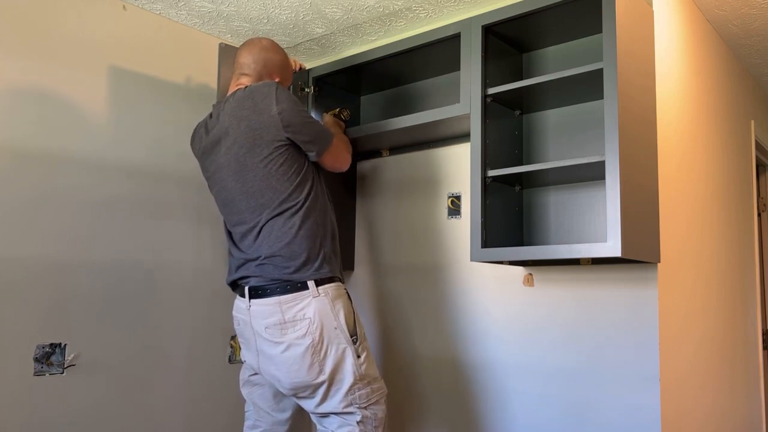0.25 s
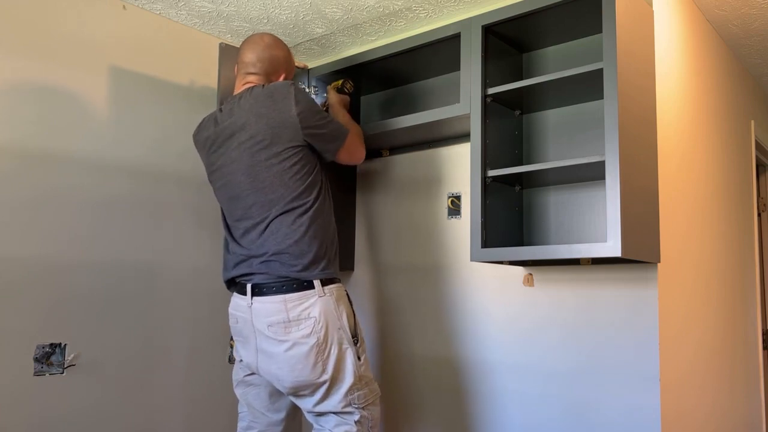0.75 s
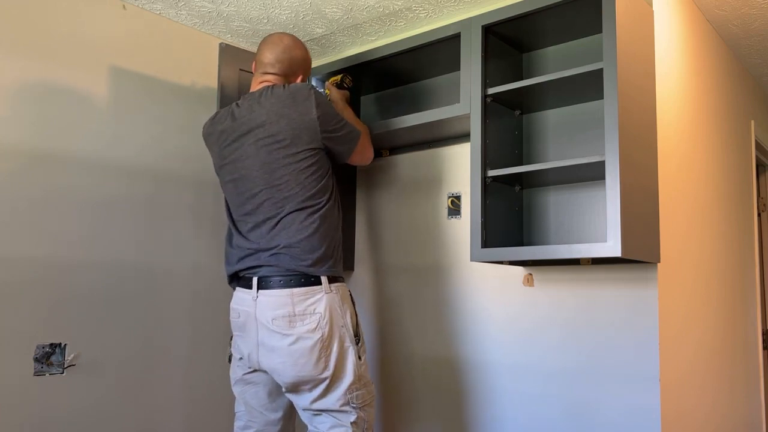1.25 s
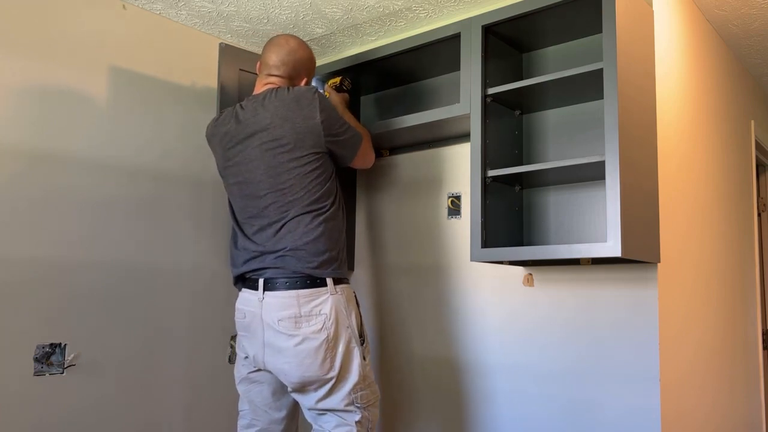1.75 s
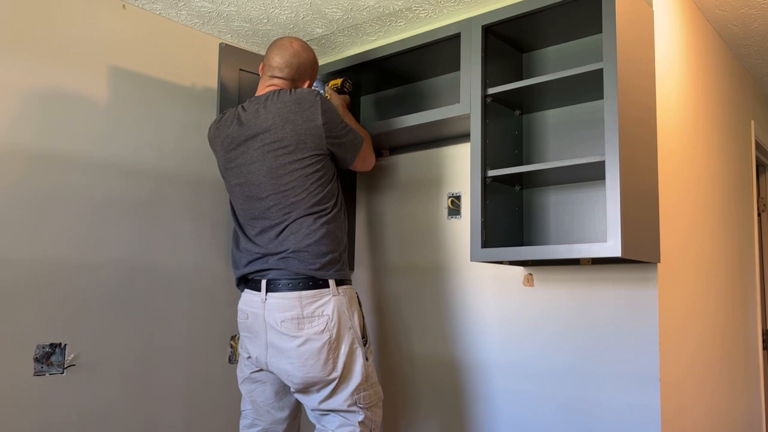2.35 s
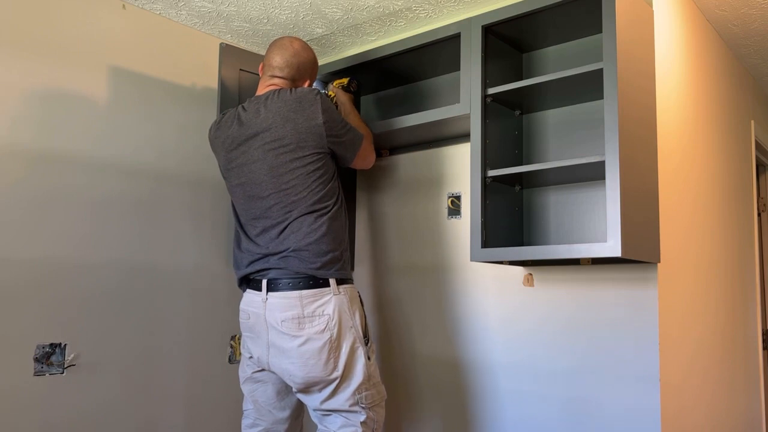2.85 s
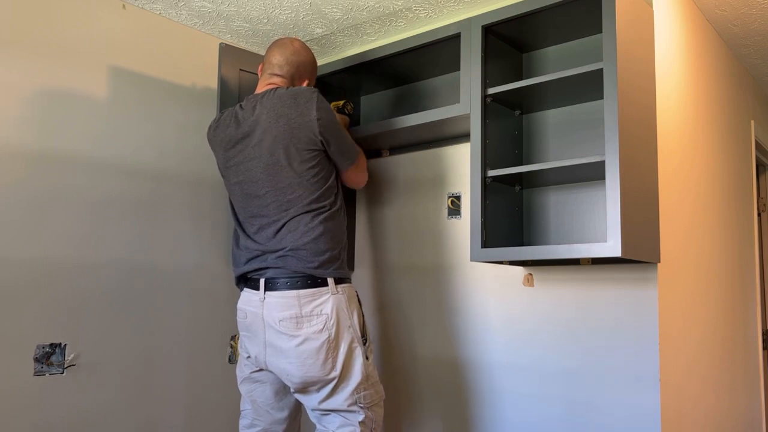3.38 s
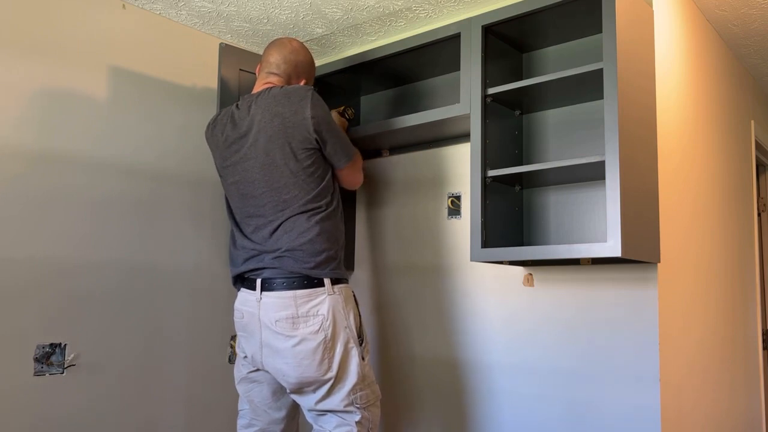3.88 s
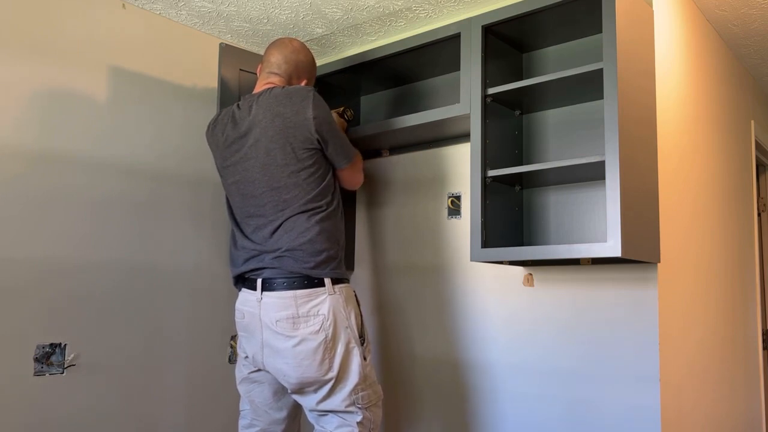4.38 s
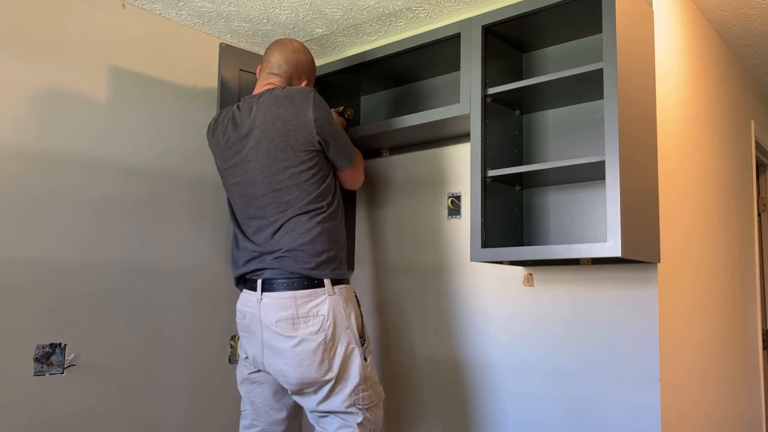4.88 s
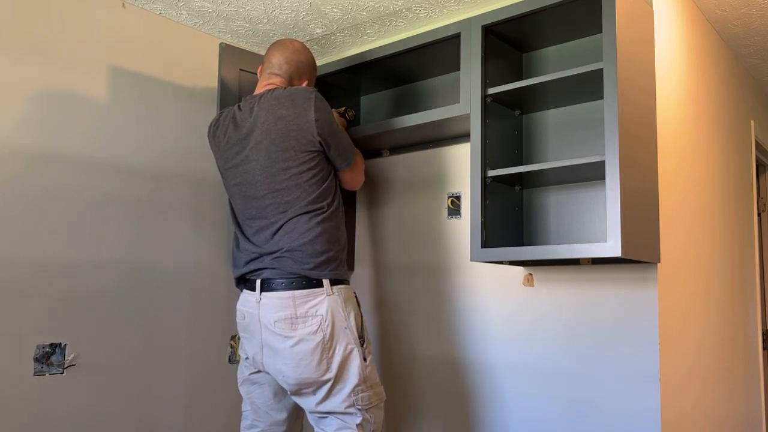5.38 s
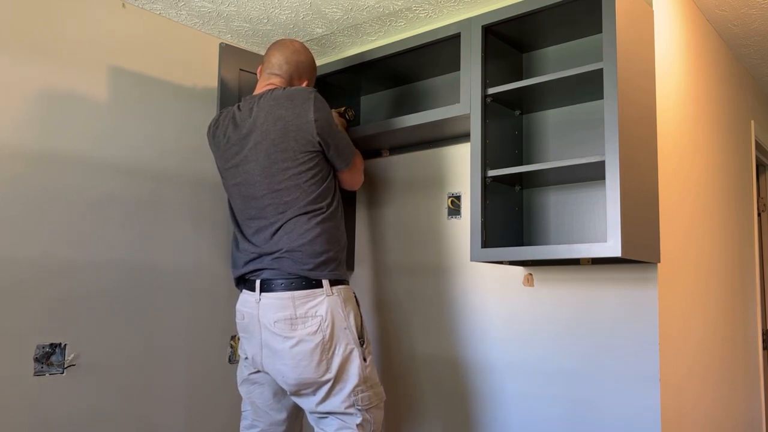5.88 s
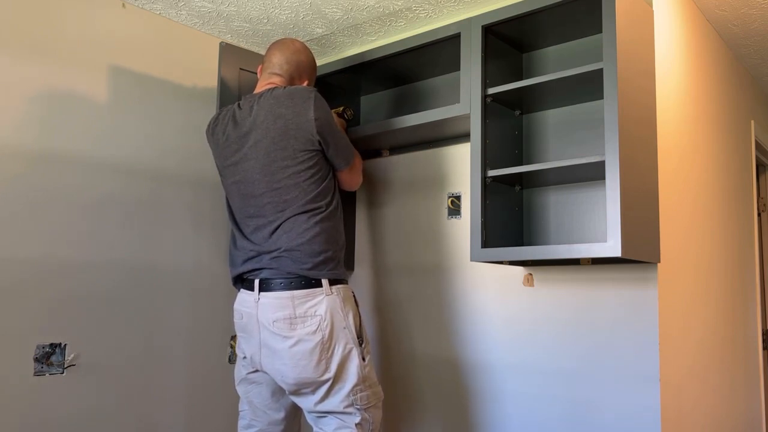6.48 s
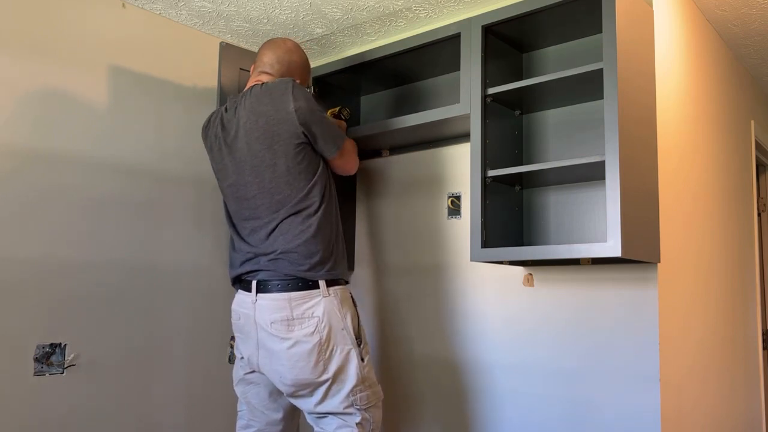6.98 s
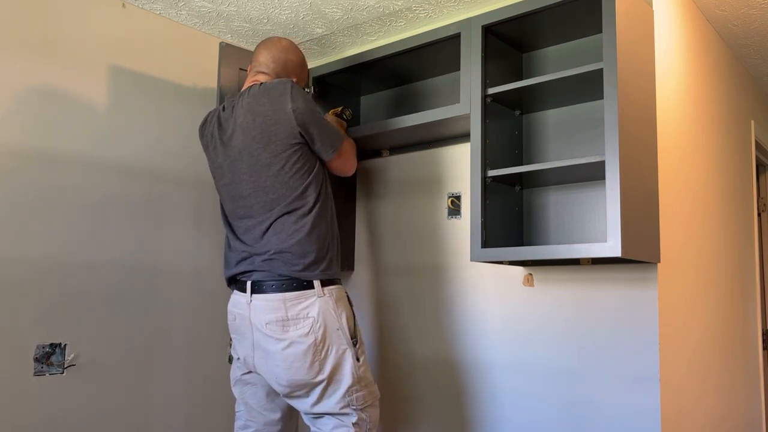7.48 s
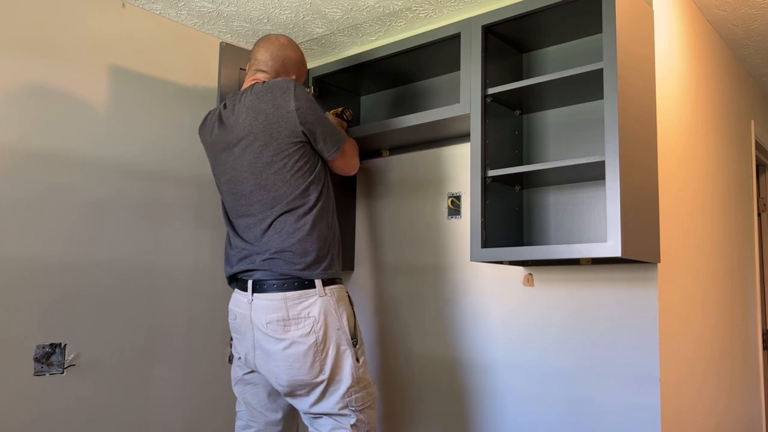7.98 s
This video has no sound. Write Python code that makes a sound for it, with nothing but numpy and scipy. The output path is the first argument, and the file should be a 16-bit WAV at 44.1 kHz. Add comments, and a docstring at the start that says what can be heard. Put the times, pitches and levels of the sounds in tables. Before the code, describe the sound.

Sharp, irregular knocks, clicks and hollow thumps with short scrapes as someone works on a wooden cabinet in a bare, echoing kitchen.

```python
"""A bare, echoing kitchen, where someone works on a wall cabinet. Hard contacts on wood and hinge
make sharp knocks and clicks, often followed by the low thump of a hollow panel. Short scrapes are
made of many tiny slips, and a steel tip ticks on the hinge. A faint, lumpy rumble lies underneath.
Two closely spaced microphones hear the sounds directly and through the room's echoes."""
import sys
import numpy as np
from scipy import signal
from scipy.fft import rfft, irfft, next_fast_len
from scipy.io import wavfile
from scipy.ndimage import uniform_filter1d

SR = 44100
rng = np.random.default_rng(int(sys.argv[2]) if len(sys.argv) > 2 else 0)


def materialize(psi):
    """Save the field psi as 16-bit PCM at rate SR to the path in sys.argv[1].

    A 1-D psi becomes a single channel; in a 2-D psi each row is a channel.
    """
    bounded = np.clip(np.atleast_2d(psi).T, -1, 1)
    quanta = np.round(bounded * 32767).astype(np.int16)
    wavfile.write(sys.argv[1], SR, quanta)


N = 363056

# Levels in these tables are set before mixing; the cabinet and the room change them further.
# Knocks (time [s], level [dB], ring pitch [Hz], wood level [dB], click level [dB], contact time [s])
KNOCK_HITS = [(0.004, -33.5, 980, -55, -49, 0.0067), (0.242, -56, 1670, -76, -82, 0.0068),
              (0.324, -45, 1030, -51, -70, .0071), (0.34, -39, 910, -36.5, -36.5, 0.045),
              (0.362, -20.5, 1184, -29, -41, 0.0061), (0.806, -54, 590, -73, -67, 0.01),
              (1.143, -41, 1510, -57, -41.5, 0.005), (1.162, -23.5, 1084, -32.5, -59, 0.0041),
              (1.355, -22, 1080, -29, -49.5, 0.016), (1.445, -29, 647, -26.5, -65, 0.0059),
              (1.563, -65.5, 870, -60, -80, 0.0037), (1.787, -52, 1940, -44, -46, 0.014),
              (1.794, -30.5, 834, -43.5, -89.5, 0.0084), (1.832, -22, 2320, -33.5, -46.5, 0.0035),
              (2.118, -35.5, 1120, -43, -71, .0037), (2.172, -15.5, 1180, -24.5, -34, 0.0034),
              (2.205, -59, 2070, -33, -48.5, 0.0061), (2.464, -44.5, 2030, -64, -61, 0.0038),
              (2.621, -30, 1610, -31, -30, 0.036), (2.633, -16, 1080, -25.5, -43, 0.0064),
              (2.804, -28.5, 1560, -41, -45, 0.0072), (2.839, -39, 990, -48, -60, 0.0022),
              (3.044, -37, 714, -37.5, -57.5, 0.036), (3.073, -30, 1110, -41, -42.5, 0.0044),
              (3.333, -52.5, 570, -52.5, -68.5, 0.0053), (3.406, -46, 1700, -61, -57.5, 0.011),
              (3.453, -28.5, 1714, -51, -38, 0.0013), (3.485, -37, 1930, -52, -38.5, .006),
              (3.854, -57.5, 1370, -65, -66, 0.01), (4.171, -25.5, 1150, -37, -42.5, 0.0084),
              (4.34, -41.5, 1750, -38, -74, 0.002), (4.371, -28.5, 1730, -80, -39, 0.0054),
              (4.414, -33.5, 1550, -35.5, -58, 0.012), (4.529, -44, 1720, -38.5, -71, 0.00093),
              (4.556, -63, 950, -35.5, -82, 0.0066), (4.824, -28.5, 1730, -40, -43, 0.0041),
              (4.871, -20, 1330, -29, -28, 0.0033), (5.243, -28, 895, -42, -37, 0.008),
              (5.314, -29, 610, -42, -50, 0.0048), (5.759, -35.5, 1200, -42.5, -49.5, 0.015),
              (6.091, -32.5, 2370, -67, -41.5, 0.0053), (6.18, -21.5, 2610, -44, -42, 0.019),
              (6.265, -18, 2630, -32, -34.5, 0.028), (6.643, -46.5, 1180, -50.5, -81, 0.0021),
              (6.79, -53, 1780, -72, -57, .0041), (6.866, -38, 1180, -54.5, -42.5, 0.0046),
              (6.899, -35.5, 1710, -58, -45.5, 0.0044), (7.256, -34, 1460, -41.5, -46, 0.0052),
              (7.36, -20, 1406, -34, -29.5, 0.0039), (7.664, -29, 1180, -34, -40, 0.0045),
              (7.955, -47, 1650, -53, -83, 0.012), (7.997, -36, 1080, -45.5, -47.5, 0.0068)]
# Soft blows on a panel (time [s], level [dB], pitch [Hz], deep push level [dB])
THUMP_HITS = [(0.017, -44.5, 282, -42), (0.188, -41.5, 193, -33), (0.27, -42, 130, -47),
              (0.638, -42.5, 107.4, -73), (0.817, -40, 286, -38), (0.947, -44.5, 159, -74),
              (1.188, -30.5, 390.5, -41), (1.386, -22.5, 195, -27), (1.467, -30, 202, -50),
              (1.8, -41, 196, -60), (2.185, -28, 409, -30), (2.331, -24, 186.5, -67),
              (2.647, -20, 159.3, -24.5), (2.84, -22, 199, -32.5), (3.352, -32.5, 148.4, -42),
              (3.412, -38, 136, -37), (3.84, -46, 348, -52), (3.881, -37.5, 350, -44.5),
              (3.969, -45, 159, -42.5), (4.189, -33, 346, -40), (4.37, -32, 139, -33),
              (4.558, -24, 193, -33), (4.842, -29.5, 198, -39.5), (4.949, -19.5, 192.7, -33),
              (5.259, -34, 354, -47.5), (5.318, -16.5, 207, -29.5), (5.789, -36.5, 348, -41),
              (5.852, -27.5, 206, -35), (6.096, -27.5, 341, -36), (6.188, -25, 214.5, -32),
              (6.227, -27, 189, -28), (6.315, -21.5, 195.5, -29.5), (6.654, -46.5, 357, -52),
              (6.893, -38, 190, -43), (7.274, -28.5, 199, -57), (7.397, -23.5, 156, -33.5),
              (7.667, -29, 220, -71), (7.762, -24, 186.7, -32.5), (8.135, -28, 146, -23)]
# Scraping strokes (start [s], length [s], start level [dB], end level [dB], brightness [dB])
SCRAPE_STROKES = [(1.355, 0.061, -10, -36, 1), (1.856, 0.36, -48.5, -47, 19.5), (2.814, 0.019, -9, -23, 4),
                  (4.367, 0.052, -42.5, -50, 1), (4.812, 0.074, -20.5, -17.5, 2.5),
                  (5.244, 0.059, -22, -15, -1.5), (6.094, 0.19, -23, -15, 9.5),
                  (7.264, 0.14, -24, -31, -1.5), (7.666, 0.056, -20, -21, 1.5)]
# Tone of a scrape (frequency [Hz], level [dB])
SCRAPE_SPECTRUM = [(120, 0.5), (200, -9), (400, -6.5), (650, -11.5), (1100, -8.5), (1800, -15),
                   (2650, -13.5), (3500, -24), (5450, -23), (7300, -32), (10800, -37), (15000, -55)]
# Hollow knocks on the door (time [s], level [dB])
DOOR_HITS = [(4.415, -34.5), (4.527, -32.5), (4.696, -53.5)]
# One blow on the door and its bounces (delay [s], level change [dB])
DOOR_BOUNCES = [(0, -0.5), (.029, -7.5), (.05, -13), (.09, -15.5)]
# A steel tip touching the hinge (time [s], level [dB])
HINGE_TICKS = [(0.362, -50.5), (0.806, -72), (1.832, -66), (2.173, -45), (2.634, -41.5), (3.454, -43),
               (4.372, -50), (4.819, -51), (6.262, -54), (6.79, -75), (6.867, -43.5)]
# Pitches at which the cabinet's body and door ring (frequency [Hz], width [Hz], level [dB])
CABINET_RESONANCES = [(178.3, 17.6, 17), (359, 19, 2.5), (635, 110, -14.5), (1015, 110, -8),
                      (1360, 68, -6.5), (1800, 41, -5), (3140, 100, -24)]
# How long the echo takes to fade by 60 dB (frequency [Hz], fade time [s])
ECHO_FADE_TIMES = [(40, 0.59), (120, 0.4), (300, 0.33), (1000, 0.58), (2500, 0.57), (6000, 0.47),
                   (12000, 0.37)]
# Tone of the rumble (frequency [Hz], level [dB])
RUMBLE_SPECTRUM = [(12, -24), (25, -8.5), (60, 6.5), (250, -7), (670, -13.5), (1900, -18), (5500, -38),
                   (8000, -41), (13000, -54.5), (15500, -72)]
# How the rumble swells and sinks (time [s], level [dB])
RUMBLE_LEVELS = [(0.0, -37), (0.13, -49), (1.19, -62.5), (1.37, -55.5), (2.68, -53), (2.82, -50.5),
                 (3.05, -54), (3.78, -58.5), (4.22, -59), (4.54, -54), (5.82, -57.5), (6.33, -61),
                 (6.49, -53), (7.27, -57.5), (7.43, -59), (8.23, -47.5)]
# How alike the two microphones sound (frequency [Hz], shared part [0 to 1])
MIC_LIKENESS = [(60, .992), (250, .87), (600, .45), (1400, .45), (2200, .96), (5000, .96), (7500, .995),
                (9000, .998), (15000, .98)]
# How far the left microphone's wave runs ahead (frequency [Hz], phase lead [rad])
LEFT_LEAD = [(60, 0), (400, .2), (700, .9), (1400, 1.8), (1900, .2), (5000, 0), (6800, -1.3), (8500, -3.14),
             (12000, -6.28), (15200, -9.5)]
# How much louder the left microphone is (frequency [Hz], left over right [dB])
LEFT_BALANCE = [(60, -.5), (130, 1), (300, -2.5), (700, 0), (1300, -3), (2400, -2.5), (4400, 0), (15000, 0)]

KNOCK_RISE_S, CRACK_S = 0.001522, 0.0044   # contacts shorter than CRACK_S get a strong first crack
RING_Q, RING_OVER_RATTLE_DB, RING_IN_ROOM = 5.6, 8, 0.34   # a higher Q rings longer
THUMP_FADE_S, THUMP_ROOM_DB = 0.029, -7
SCRAPE_DB, SLIPS_PER_S, SCRAPE_SPLIT_HZ = -11, 2700, 600
ATTACK_DB_PER_S, RELEASE_DB_PER_S, DULLING_DB_PER_S = 918, 450, 56.5   # how a scrape starts, ends, dulls
DOOR_HZ, DOOR_WIDTH_HZ = 1020, 177
# Boosts for the direct sound, which goes straight to the microphones
KNOCK_DIRECT_DB, CLICK_DIRECT_DB, WOOD_DIRECT_DB = 22, 24.5, 12
THUMP_DIRECT_DB, SCRAPE_DIRECT_DB, DOOR_DIRECT_DB, TICK_DIRECT_DB = 24.5, 12, 31.5, 23
BUILD_CYCLES, EARLY_ECHO_DB, EARLY_ECHO_S = 4.4, -3.5, 0.013
GATE_FROM_HZ, GATE_DB, CUTOFF_HZ = 1500, -76.5, 15800


def knocks(places):
    """Each hard contact rings at its own pitch, with a woody note below and a click above."""
    noise = rng.standard_normal((len(KNOCK_HITS), SR // 8))
    contact_s = np.array(KNOCK_HITS)[:, [5]]
    tap = signal.unit_impulse(SR // 8, round(KNOCK_RISE_S * SR))   # one clean blow
    hits = unit(contact(noise, KNOCK_RISE_S, contact_s)) + tap * 0.0013 / contact_s   # short means crisp
    woods = unit(band(hits, 330, 800))
    rattles = unit(band(band(hits, 700, 2700), 700, 2700))
    cracks = hits + tap * CRACK_S / contact_s
    clicks = unit(band(cracks, 2140, 5060)) + amp(-18.5) * unit(band(cracks, 3600, 11660))
    ring_share = amp(RING_OVER_RATTLE_DB) / np.sqrt(1 + amp(RING_OVER_RATTLE_DB) ** 2)
    direct, to_room = np.zeros(N), np.zeros((places, N))
    for k, (time_s, level_db, ring_hz, wood_db, click_db, _) in enumerate(KNOCK_HITS):
        ringing = resonance(cracks[k], ring_hz, ring_hz / RING_Q)
        ring = amp(level_db) * ring_share * unit(resonance(ringing, ring_hz, width_hz=ring_hz))
        rattle = amp(level_db) * np.sqrt(1 - ring_share ** 2) * rattles[k]
        click = amp(click_db) * clicks[k]
        wood = amp(wood_db) * woods[k]
        add(to_room[k % places], time_s, rattle + click + RING_IN_ROOM * ring + wood)   # places take turns
        body = amp(KNOCK_DIRECT_DB) * (rattle + ring)
        add(direct, time_s, body + amp(CLICK_DIRECT_DB) * click + amp(WOOD_DIRECT_DB) * wood)
    return direct, to_room


def thumps():
    """A soft blow sets a panel booming near one pitch, with a deep push under it."""
    noise, out = rng.standard_normal((len(THUMP_HITS), SR // 3)), np.zeros(N)
    t = np.arange(SR // 3) / SR
    swell = contact(np.ones(len(t)), rise_s=0.0051, fade_s=THUMP_FADE_S)
    thuds = unit(band(contact(noise, rise_s=0.0054, fade_s=THUMP_FADE_S), 156, 362))
    pushes = unit(band(contact(noise, rise_s=0.0075, fade_s=0.04), 48, 89))
    for k, (time_s, level_db, hz, push_db) in enumerate(THUMP_HITS):
        tone = unit(np.sin(2 * np.pi * hz * t) * swell)
        boom = unit(tone + 0.7 * thuds[k])
        add(out, time_s, amp(level_db) * boom + amp(push_db) * pushes[k])
    return out


def scrapes():
    """Many tiny, uneven slips blur into a scrape that gets duller along the stroke."""
    t, gain, brightness = np.arange(N) / SR, np.zeros(N), np.ones(N)
    for start_s, length_s, start_db, end_db, bright_db in SCRAPE_STROKES:
        inside = (t > start_s - .05) & (t < start_s + length_s + .15)
        since = t[inside] - start_s
        edges_db = ATTACK_DB_PER_S * np.minimum(since, 0)
        edges_db -= RELEASE_DB_PER_S * np.maximum(since - length_s, 0)
        gain[inside] = amp(np.interp(since, [0, length_s], [start_db, end_db]) + edges_db)
        brightness[inside] = amp(bright_db - DULLING_DB_PER_S * since)
    slipping = rng.random(N) < SLIPS_PER_S / SR
    strength = amp(3.9 * np.minimum(rng.exponential(1, N), 3))
    slips = slipping * strength * rng.choice([-1, 1], N)
    hz = frequencies()
    spectrum = rfft(slips) * amp(at_hz(SCRAPE_SPECTRUM, hz))
    high_share = hz ** 2 / (hz ** 2 + SCRAPE_SPLIT_HZ ** 2)
    lows, highs = irfft(spectrum * (1 - high_share), N), irfft(spectrum * high_share, N)
    energy_in_50_ms = np.mean((lows + highs) ** 2) * SR / 20
    return amp(SCRAPE_DB) * gain * (lows / brightness + highs * brightness) / np.sqrt(energy_in_50_ms)


def door_knocks():
    """A clean blow and its bounces ring at the hollow door panel's one pitch."""
    taps = np.zeros(N)
    for time_s, level_db in DOOR_HITS:
        for delay_s, change_db in DOOR_BOUNCES:
            taps[round((time_s + delay_s) * SR)] += amp(level_db + change_db)
    ring = resonance(taps + 1e-18, DOOR_HZ, DOOR_WIDTH_HZ)
    return resonance(ring, DOOR_HZ, 3 * DOOR_WIDTH_HZ) * np.sqrt(SR / DOOR_WIDTH_HZ)


def hinge_ticks():
    """A steel tip touches the hinge so briefly that it makes only a bright tick."""
    noise, out = rng.standard_normal((len(HINGE_TICKS), SR // 20)), np.zeros(N)
    ticks = unit(band(contact(noise, rise_s=0.0002, fade_s=0.0016), 5500, 12000))
    for (time_s, level_db), tick in zip(HINGE_TICKS, ticks):
        add(out, time_s, amp(level_db) * tick)
    return out


def cabinet(x):
    """The cabinet's body and door add their own ringing to a sound."""
    return x + sum(amp(db) * resonance(x, hz, width_hz) for hz, width_hz, db in CABINET_RESONANCES)


def room_echoes(to_room):
    """Bare walls give echoes that build up, then fade at each band's own rate. Returns two versions."""
    t, places = np.arange(SR) / SR, len(to_room)
    edges_hz = 30 * 2 ** np.arange(0, 9.6, .5)   # half an octave apart
    noise, tails = rng.standard_normal((2, 2 * places, SR)), 0
    for k, (low, high) in enumerate(zip(edges_hz, edges_hz[1:])):
        hz = np.sqrt(low * high)
        build = 1 - np.exp(-t * hz / BUILD_CYCLES)
        fade = amp(-60 * t / at_hz(ECHO_FADE_TIMES, hz))
        tails = tails + band(noise[k % 2], low, min(high, .45 * SR)) * build * fade
    tails *= 1 + amp(EARLY_ECHO_DB) * np.exp(-t / EARLY_ECHO_S)   # early echoes make the start louder
    size = next_fast_len(N + SR)
    echoes = rfft(to_room, size) * rfft(tails.reshape(2, places, -1), size)
    return irfft(echoes.sum(axis=1), size)[:, :N]


def rumble():
    """Two unrelated streams of faint, low noise swell and sink together."""
    t = np.arange(N) / SR
    tone = amp(at_hz(RUMBLE_SPECTRUM, frequencies()))
    noise = irfft(rfft(rng.standard_normal((2, N))) * tone, N)
    swell_db = np.interp(t, *np.transpose(RUMBLE_LEVELS))
    wobble_db = 0.61 * np.interp(9 * t, np.arange(1000), rng.standard_normal(1000))   # 9 steps a second
    return amp(swell_db + wobble_db) * noise / np.std(noise)


def microphones(shared, right_only):
    """The right microphone hears a shifted share of what the left hears, plus a part of its own."""
    hz = frequencies()
    likeness = at_hz(MIC_LIKENESS, hz)
    balance = amp(at_hz(LEFT_BALANCE, hz) / 2)
    shift = np.exp(-1j * at_hz(LEFT_LEAD, hz))
    left = rfft(shared)
    right = likeness * left * shift + np.sqrt(1 - likeness ** 2) * rfft(right_only)
    return irfft(np.array([left * balance, right / balance]), N)


def contact(x, rise_s, fade_s):
    """Shape a sound like the pressure of a blow: it rises, then dies away."""
    t = np.arange(x.shape[-1]) / SR
    return x * (1 - np.exp(-t / rise_s)) * np.exp(-t / fade_s)


def resonance(x, hz, width_hz):
    """Make a sound ring at one pitch; a narrower width rings longer."""
    decay = np.exp(-np.pi * width_hz / SR)
    gain = (1 - decay ** 2) / 2
    return signal.lfilter([gain, 0, -gain], [1, -2 * decay * np.cos(2 * np.pi * hz / SR), decay ** 2], x)


def band(x, low_hz, high_hz):
    return signal.sosfilt(signal.butter(2, [low_hz, high_hz], "band", fs=SR, output="sos"), x)


def amp(db):
    return 10 ** (np.asarray(db) / 20)


def unit(x):
    """Scale each row to a total energy of 1."""
    return x / np.sqrt(np.sum(x ** 2, axis=-1, keepdims=True) + 1e-20)


def frequencies():
    return np.fft.rfftfreq(N, 1 / SR) + 1   # 1 Hz up, to avoid zero


def at_hz(table, hz):
    """Read between a table's rows, giving each octave equal space."""
    table_hz, values = np.transpose(table)
    return np.interp(np.log(hz), np.log(table_hz), values)


def add(track, time_s, sound):
    start = round(time_s * SR)
    track[start:start + len(sound)] += sound[:N - start]


def scene():
    """Mix the direct sounds with their echoes from three places in the room, over the rumble."""
    booms, rubbing, door = thumps(), scrapes(), door_knocks()
    knocking, to_room = knocks(places=3)
    ticks = hinge_ticks()
    direct = cabinet(knocking + amp(SCRAPE_DIRECT_DB) * rubbing)
    direct += amp(THUMP_DIRECT_DB) * booms + amp(DOOR_DIRECT_DB) * door + amp(TICK_DIRECT_DB) * ticks
    to_room[0] += rubbing
    to_room = cabinet(to_room)
    to_room[1] += amp(THUMP_ROOM_DB) * booms
    to_room[2] += door + ticks
    shared, right_only = room_echoes(to_room) + rumble()
    return microphones(shared + direct, right_only + 0.19 * direct)


def record(dry):
    """A noise gate turns the treble down when it is quiet, and a filter cuts the very top."""
    treble = irfft(rfft(dry) / (1 + (GATE_FROM_HZ / frequencies()) ** 8), N)
    power = np.abs(uniform_filter1d(np.mean(treble ** 2, axis=0), size=SR // 40))
    closed = amp(GATE_DB) ** 2 / (power + amp(GATE_DB) ** 2)   # 0 is open, 1 is shut
    top_cut = signal.cheby2(12, 70, CUTOFF_HZ, fs=SR, output="sos")
    return signal.sosfilt(top_cut, dry - closed * treble)


dry = scene()
out = record(dry)
materialize(out)
```